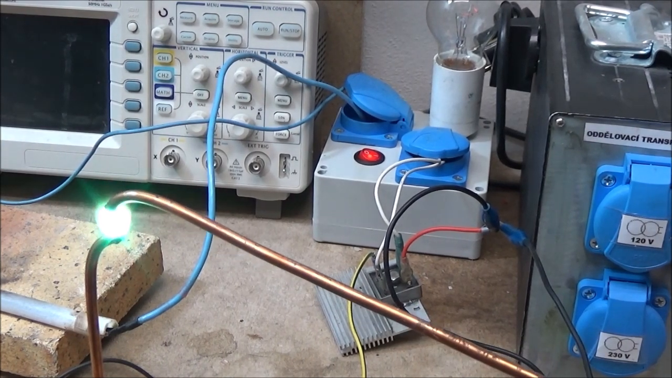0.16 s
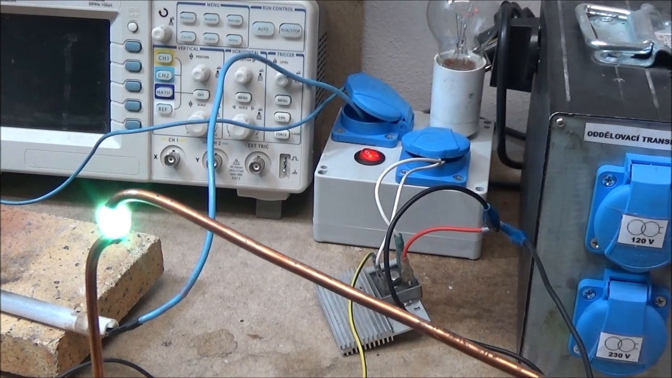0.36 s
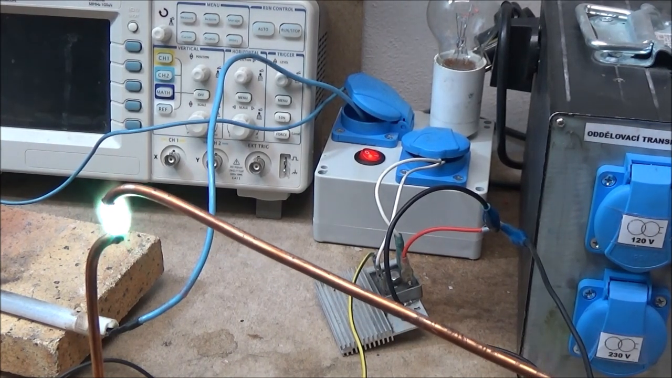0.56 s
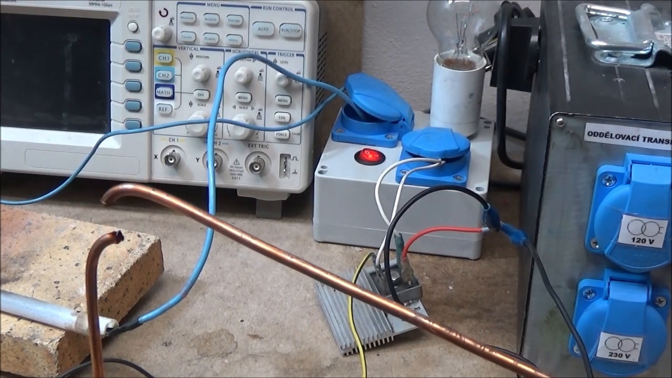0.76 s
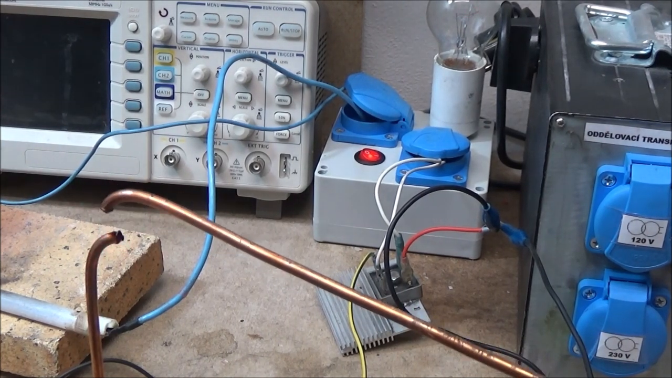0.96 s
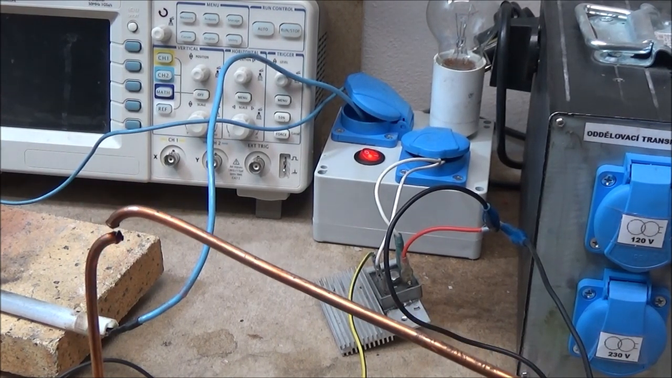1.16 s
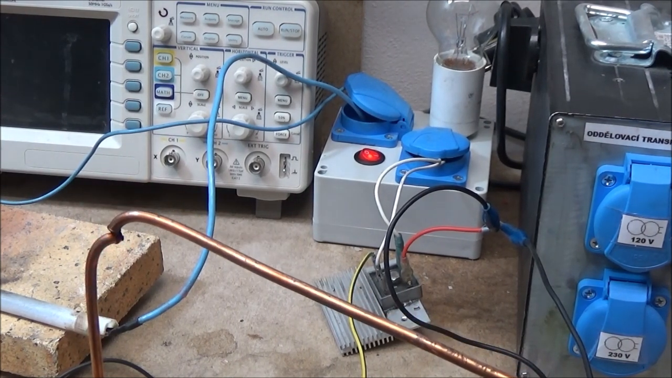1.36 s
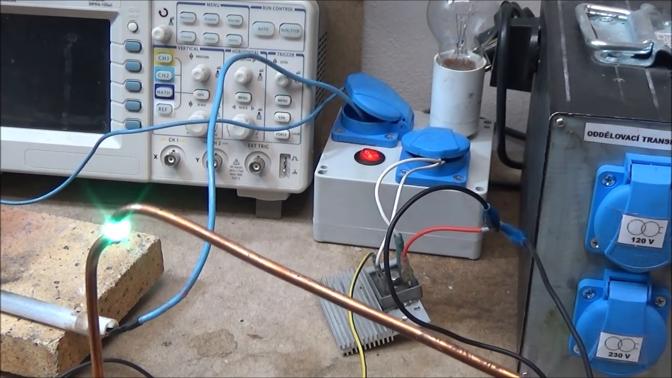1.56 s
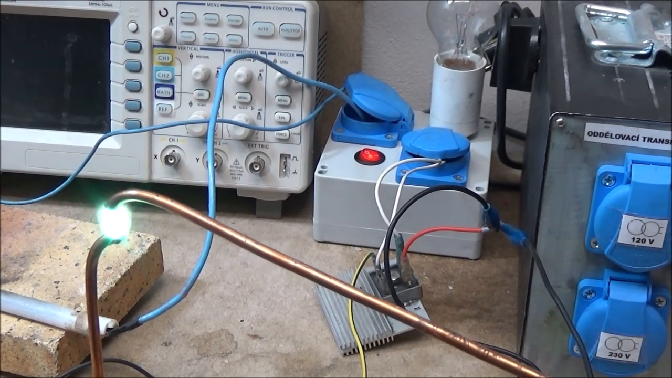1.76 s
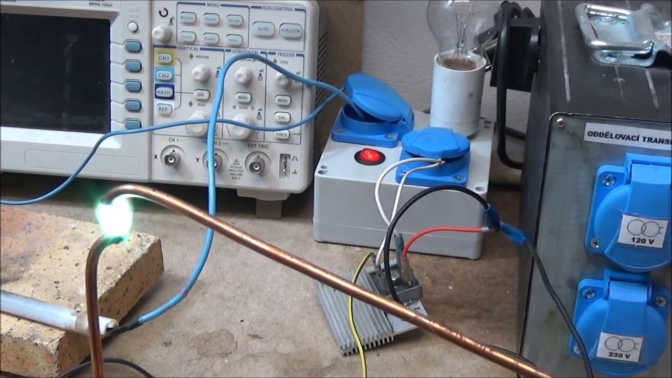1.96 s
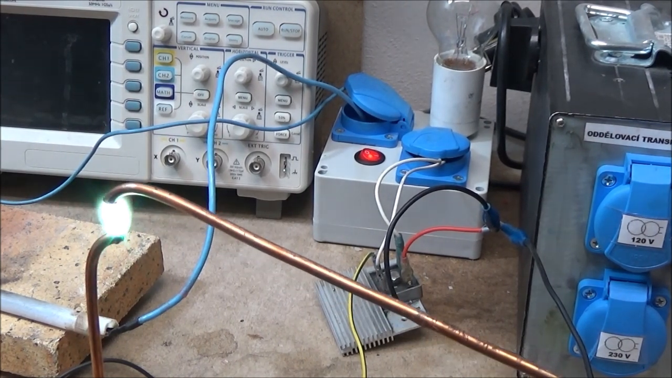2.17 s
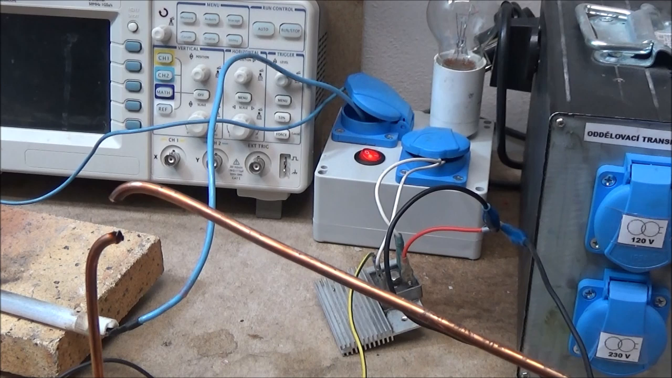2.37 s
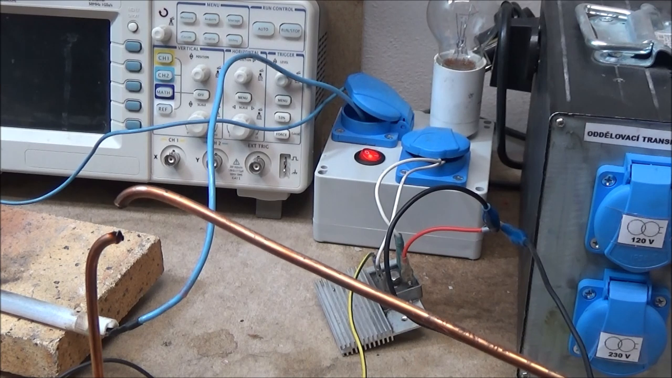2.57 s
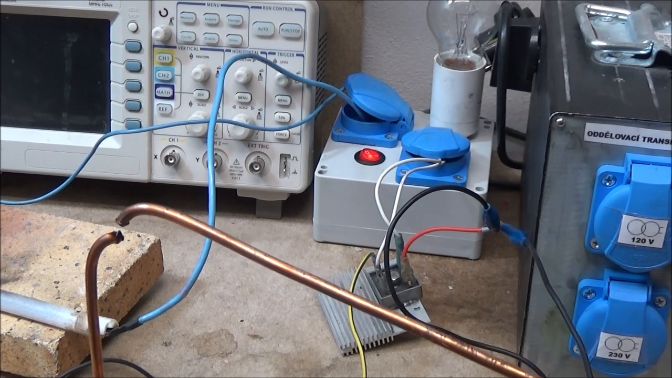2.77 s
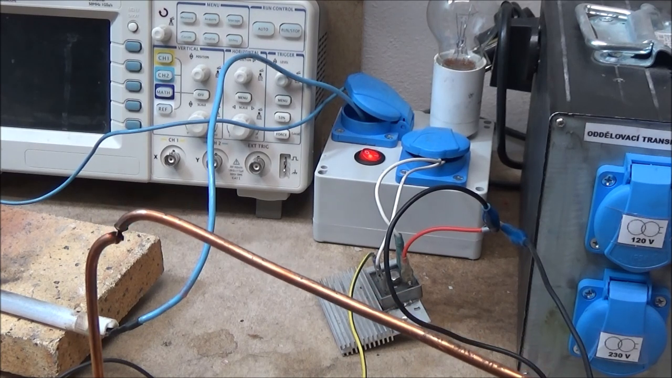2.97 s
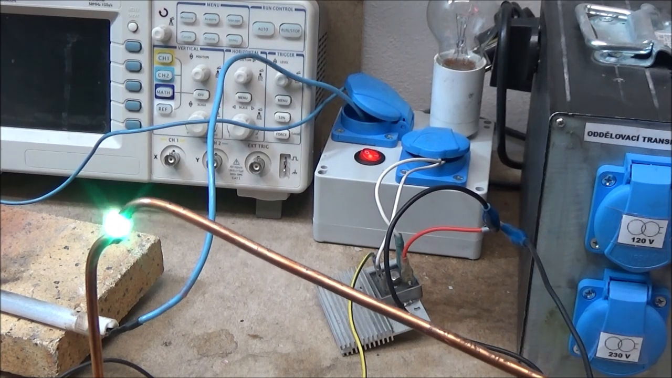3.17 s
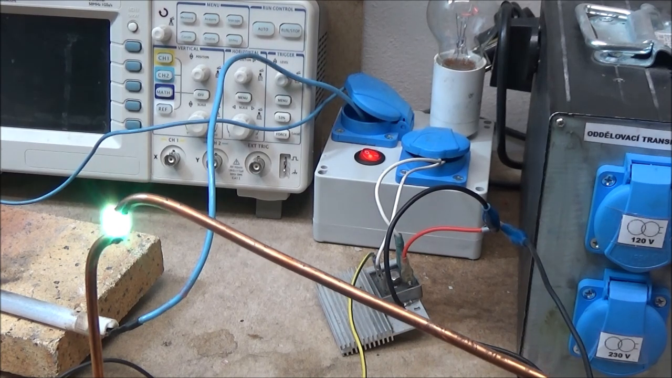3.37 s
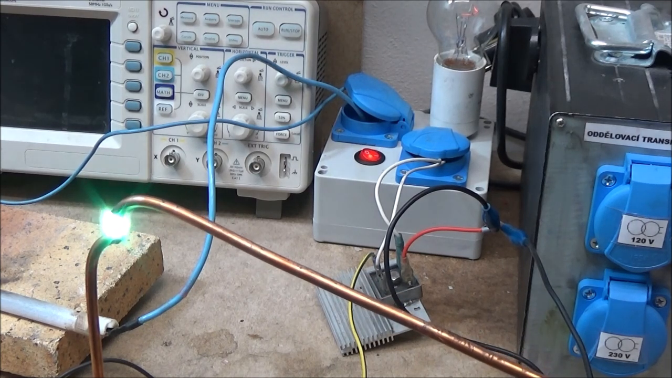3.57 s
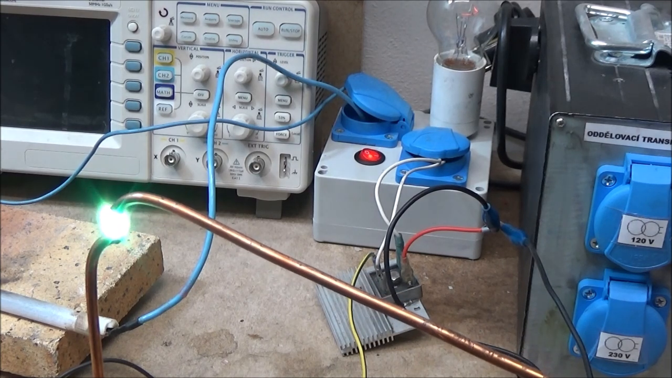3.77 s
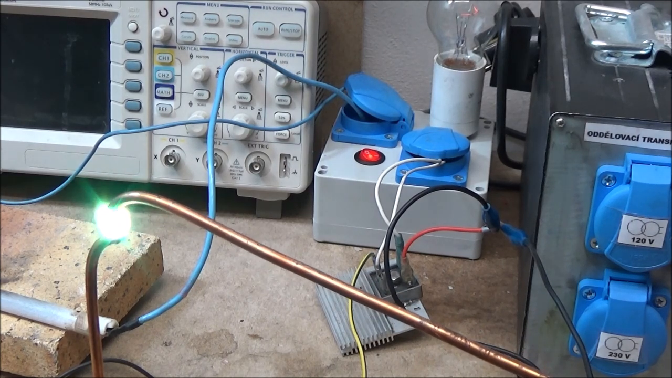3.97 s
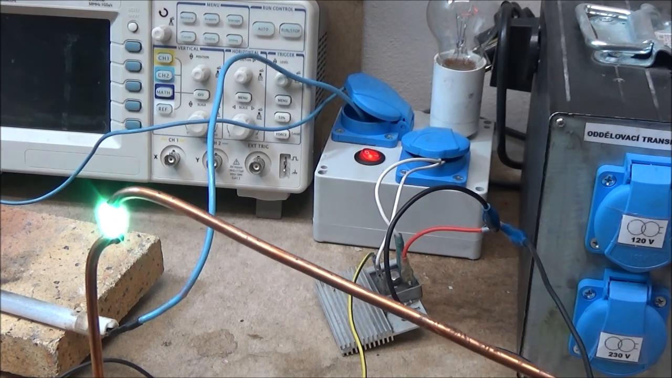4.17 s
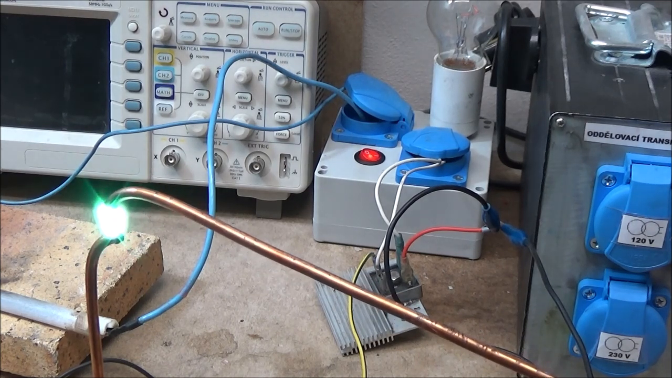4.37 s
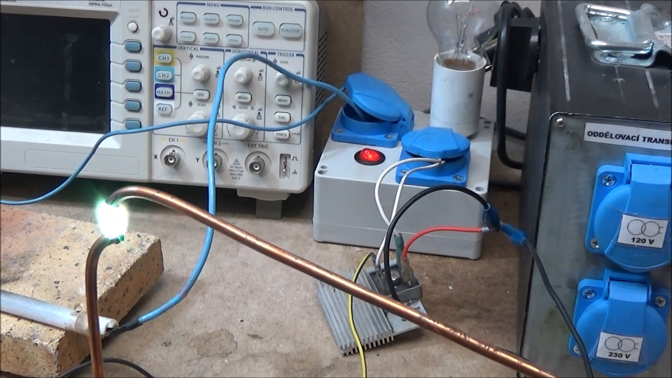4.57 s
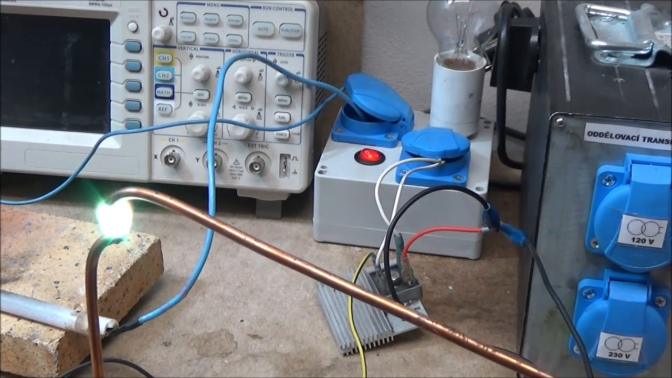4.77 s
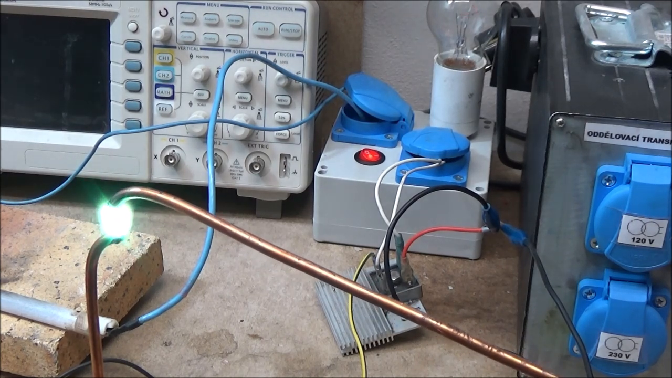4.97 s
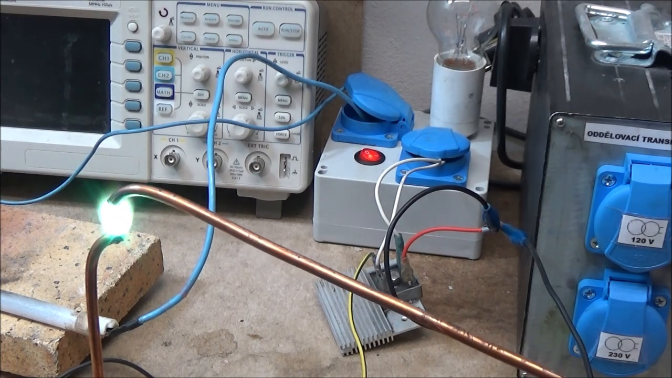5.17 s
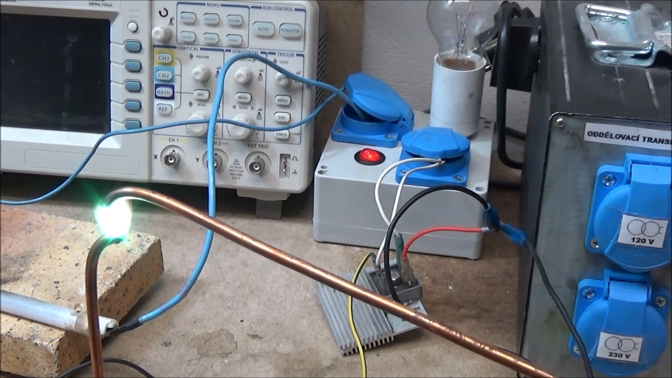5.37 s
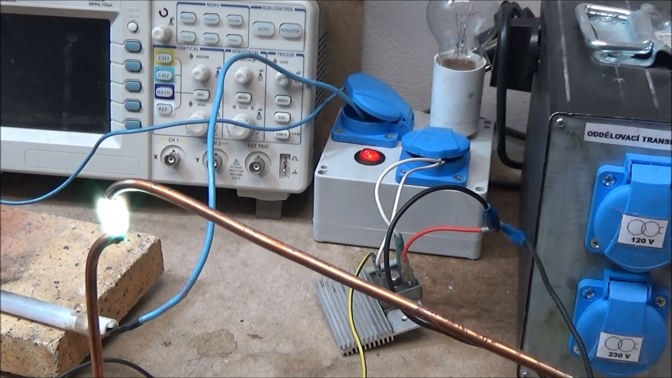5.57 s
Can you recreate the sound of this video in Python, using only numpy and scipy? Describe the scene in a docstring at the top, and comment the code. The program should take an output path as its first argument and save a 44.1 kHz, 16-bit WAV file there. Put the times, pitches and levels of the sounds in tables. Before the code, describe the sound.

Close up on a workshop bench, a hissing, crackling electric arc burns in three bursts with a low mains hum underneath. The first two end suddenly in a dull pop, leaving quiet room noise and a faint, rapid electronic ticking. Each time, copper pipes tap and bounce together before the arc restarts. The last burst is the longest, sagging for a moment and then sizzling on.

```python
"""Arc between copper pipes

Close to a workshop bench, the pipe ends a little left of the microphone. A mains-fed arc sizzles over
a low hum, coloured by short echoes from things on the bench. Twice it goes out with a soft pop, the
pipes knock together and it catches again; the last arc weakens, recovers and burns on.
In the pauses there is room noise and a faint electronic ticking."""
import sys
import numpy as np
from scipy import signal
from scipy.fft import rfft, irfft, next_fast_len
from scipy.io import wavfile
from scipy.ndimage import uniform_filter1d

SR = 44100
rng = np.random.default_rng(int(sys.argv[2]) if len(sys.argv) > 2 else 0)


def output_pcm(signal):
    """Save a mono or channel-first signal as 16-bit PCM at the path in sys.argv[1].

    Samples are clipped to [-1, 1] before scaling.
    """
    pcm = np.clip(np.atleast_2d(signal).T, -1, 1) * 32767
    wavfile.write(sys.argv[1], SR, np.round(pcm).astype(np.int16))


N = 247401
TIME = np.arange(N) / SR
FFT_SIZE = next_fast_len(N + SR)
FREQS = np.fft.rfftfreq(FFT_SIZE, 1 / SR)


def from_db(db):
    """Decibels to gain."""
    return 10 ** (np.asarray(db) / 20)


def unit_rms(x):
    """Scale to unit power."""
    return x / np.sqrt(np.mean(x ** 2) + 1e-20)


def over_hz(points):
    """A spectrum table at every frequency, joined on a log axis."""
    hz, value = np.transpose(points)
    return np.interp(np.log(FREQS + 1), np.log(hz), value)


def filtered(x, response):
    """Apply a frequency response."""
    return irfft(rfft(x, FFT_SIZE) * response, FFT_SIZE)[..., :N]


def butter(x, hz, kind, order=2):
    """Causal low-, high- or band-pass."""
    return signal.sosfilt(signal.butter(order, hz, kind, fs=SR, output="sos"), x + 1e-18)


def drift(hz):
    """A smooth random curve of unit power that changes about hz times a second."""
    return unit_rms(filtered(rng.standard_normal(N), 1 / (1 + (FREQS / hz) ** 2)))


def clicks(rows):
    """One impulse for each row of seconds and dB."""
    out = np.zeros(N)
    for s, db in rows:
        out[int(s * SR)] += from_db(db)
    return out


def snaps(rows, colour):
    """Impulses of a given colour that peak at their listed level."""
    return filtered(clicks(rows), colour / np.abs(irfft(colour)).max())


def ring(hits, hz, t60):
    """Each impulse sets a dying sine ringing."""
    radius, angle = np.exp(-np.log(1000) / (t60 * SR)), 2 * np.pi * hz / SR
    return signal.lfilter([0, np.sin(angle)], [1, -2 * radius * np.cos(angle), radius ** 2], hits + 1e-18)


def dying_noise(hits, t60):
    """Noise that jumps up with each impulse and dies away."""
    fade = signal.lfilter([1], [1, -np.exp(-np.log(1000) / (t60 * SR))], hits + 1e-18)
    return fade * rng.standard_normal(N)


# The arcs; the third barely catches. Each row: times of striking, catching and going out in seconds,
# flare in dB, time to fill out in seconds, time for the hum to swell in seconds.
ARC_BURNS = [(-.5, -.45, .731, 0, .02, .4), (1.454, 1.542, 2.327, 4.5, 0.036, .12),
             (2.94, 2.959, 2.981, -1, 0.036, .3), (3.007, 3.033, 5.7, 3, 0.0082, 0.41)]
# The last arc weakens and recovers. Each row: time in seconds, relative sizzle in dB.
LAST_BURN = [(3.13, -29.5), (4.0, -29), (4.02, -33), (4.26, -37.5), (4.56, -36.5), (4.58, -39),
             (4.63, -31.5), (4.75, -30.5), (5.6, -30.5)]
# The arc chokes briefly. Each row: centre and half length in seconds, changes of sizzle and body in dB.
ARC_CHOKES = [(3.353, 0.0079, -3, -8), (4.59, .018, -1.5, -1)]


def burning(settled_db=-30.5, fizz_db=-14, thin_db=-10, starve_db=-9.5,
            strike_s=0.0048, catch_db_per_s=500, flare_s=0.037, starve_s=0.02):
    """Supply load, sizzle and body: a barely parted contact fizzes, flares, fills out, then starves."""
    load, sizzle, body_db = np.zeros((3, N))
    held_db = np.interp(TIME, *np.transpose(LAST_BURN), left=settled_db)
    for start_s, alight_s, out_s, flare_db, fill_s, swell_s in ARC_BURNS:
        rise = np.clip((TIME - start_s) / strike_s, 0, 1)
        on = uniform_filter1d(rise * (TIME <= out_s), size=180)
        wait, age = np.maximum(alight_s - TIME, 0), np.maximum(TIME - alight_s, 0)
        catch_db = np.maximum(flare_db * np.exp(-age / flare_s) - catch_db_per_s * wait, fizz_db)
        fade_db = starve_db * np.clip(1 - (out_s - TIME) / starve_s, 0, 1)
        load += on * (1 - np.exp(-age / swell_s))
        sizzle += on * from_db(held_db + catch_db + fade_db)
        body_db += on * thin_db * np.exp(-(age / fill_s) ** 2)
    for centre_s, half_s, sizzle_change_db, body_change_db in ARC_CHOKES:
        dip = np.exp(-((TIME - centre_s) / half_s) ** 2)
        sizzle *= from_db(sizzle_change_db * dip)
        body_db += body_change_db * dip
    return load, sizzle, body_db


# The sizzle right at the gap. Each row: frequency in Hz, relative level in dB.
ARC_SPECTRUM = [(60, -26), (200, -21.5), (500, -11.5), (800, -17), (1200, -10), (1550, -10.5), (1900, -7),
                (3000, -6.5), (4500, -2.5), (7000, -0.63), (9800, 0.0), (11500, -4), (13500, -13),
                (15600, -20.5)]
# A fresh arc is thin and bright, and fills out as the gap opens.
# Each row: upper band edge in Hz, dB gained per dB of body.
BODY_BANDS = [(3000, 1), (6500, .35), (9500, 0), (20000, -.28)]
# Molten copper spits. Each row: time in seconds, peak at the gap in dB.
COPPER_SPITS = [(2.308, -20), (2.315, -17), (3.0408, -12), (3.1016, -18), (3.1877, -18), (4.4262, -22),
                (4.535, -26), (4.544, -25)]


def arc(sizzle, body_db, sparks_per_s=14000, spread_db=3.5, hiss=0.5, flicker_db=1.4,
        strong_db=-30, mains_hz=50, trim_db=-1.45):
    """Tiny discharges crackle over a hiss; a weak arc has fewer and throbs more with each half wave."""
    weakness = np.clip(1 - sizzle / from_db(strong_db), 0, 1)
    density = 1 - .8 * weakness
    fires = rng.random(N) < sparks_per_s * density / SR
    sizes = from_db(spread_db * np.minimum(rng.exponential(1, N), 4.5)) * rng.choice([-1, 1], N)
    crackle = unit_rms(fires * sizes / np.sqrt(density)) + hiss * rng.standard_normal(N)
    half_waves = np.cos(4 * np.pi * mains_hz * (TIME - .0053))
    throb = 1 + (0.11 + 0.22 * weakness) * half_waves
    crackle *= throb * from_db(flicker_db * drift(260))
    colour = from_db(over_hz(ARC_SPECTRUM))
    settled = unit_rms(butter(filtered(crackle, colour), 85, "high"))
    burn, lower_bands = 0, 0
    for edge_hz, share in BODY_BANDS:
        below_edge = filtered(settled, 1 / (1 + (FREQS / edge_hz) ** 8))
        burn += (below_edge - lower_bands) * from_db(share * body_db)
        lower_bands = below_edge
    return from_db(trim_db) * sizzle * burn + snaps(COPPER_SPITS, colour)


# Brick, pipes and instruments near the gap. Each row: echo delay in milliseconds, signed gain.
NEAR_ECHOES = [(0.707, 0.25), (0.735, -0.2), (0.903, 0.41), (1.034, 0.084), (1.156, 0.1), (1.944, -0.084),
               (2.23, 0.091), (2.28, -0.17), (2.364, 0.078), (2.48, -0.15), (2.71, 0.065), (2.802, -0.087),
               (2.86, 0.07), (2.942, -0.071), (3.173, 0.093), (3.546, -0.08), (4.755, -0.11), (4.923, 0.12),
               (6.282, -0.095), (8.729, -0.15), (10.309, 0.15)]


def bench(x):
    """The arc is a point source, so near echoes cut sharp, steady combs into its sound."""
    delay_ms, gains = np.transpose(NEAR_ECHOES)
    coarse_hz = FREQS[::16]
    comb = 1 + np.exp(-2j * np.pi * np.outer(coarse_hz, delay_ms / 1000)) @ gains
    return filtered(x, np.interp(FREQS, coarse_hz, comb))


# The supply under full load. Each row: frequency in Hz, rms level in dB.
HUM_PARTIALS = [(100, -61.6), (200, -68.5), (300, -75), (400, -76)]


def hum(load):
    """Hum at twice the mains rate swells as the arc is drawn out."""
    waver = from_db(.6 * drift(5))
    partials = sum(from_db(db) * np.sin(2 * np.pi * (hz * TIME + rng.random()))
                   for hz, db in HUM_PARTIALS)
    return np.sqrt(2) * partials * waver * load


# What the room returns to the microphone. Each row: frequency in Hz, gain in dB.
ROOM_RETURN = [(100, -11), (300, -6), (1000, -7.5), (3000, -11.5), (8000, -14.5), (12500, -14.5),
               (16000, -19)]


def workshop(x, early_t60=0.12, late_t60=0.48, late_gain=0.47, first_echo_s=0.003):
    """Dense reflections from near clutter die quickly, those from the walls linger; each side differs."""
    t = TIME[:SR // 2]
    early, late = rng.standard_normal((2, 2, len(t)))
    clutter = early * np.exp(-np.log(1000) * t / early_t60)
    walls = late_gain * late * np.exp(-np.log(1000) * t / late_t60)
    tail = (clutter + walls) * (t > first_echo_s)
    tail /= np.sqrt(np.sum(tail ** 2, axis=1, keepdims=True))
    return filtered(x, rfft(tail, FFT_SIZE) * from_db(over_hz(ROOM_RETURN)))


# Room tone around the microphone. Each row: frequency in Hz, relative level in dB.
ROOM_TONE = [(15, -33), (25, -2), (49, -8), (76, -2), (427, -4.5), (488, -6.5), (694, -6), (960, -10),
             (2610, -12), (2910, -12.5), (3330, -14.5), (4240, -15), (15900, -21)]
# Its stereo width. Each row: frequency in Hz, likeness of left and right from 0 to 1.
ROOM_LIKENESS = [(60, 1), (250, 0.68), (1000, 0), (4000, 0.43), (12000, 1)]


def room_tone(level_db=-59):
    """Steady noise and hiss, wide in the middle range, alike on both sides in the bass and at the top."""
    mid, side = rng.standard_normal((2, N))
    colour, alike = from_db(over_hz(ROOM_TONE)), over_hz(ROOM_LIKENESS)
    mid = filtered(mid, colour)
    side = filtered(side, colour * np.sqrt((1 - alike) / (1 + alike)))
    return from_db(level_db) * (mid + side * [[1], [-1]]) / mid.std()


# A rumble in the centre. Each row: time in seconds, rms level in dB.
RUMBLE_FADE = [(0, -54), (.08, -55), (.2, -63), (.45, -69), (.8, -85)]


def rumble(band_hz=(35, 85)):
    """Low noise dies away within the first second."""
    level_db = np.interp(TIME, *np.transpose(RUMBLE_FADE))
    return from_db(level_db) * unit_rms(butter(rng.standard_normal(N), band_hz, "band"))


def ticking(low_hz=2600, high_hz=3300, strong_db=-54, weak_db=-57, glide_s=0.0011, length_s=0.0091):
    """Faint electronic chirps, 25 a second, glide upward; every other one is stronger and rises later."""
    starts = np.arange(.025, 5.58, .04)
    t = TIME[:SR // 25]
    envelope = np.sin(np.pi * np.minimum(t / length_s, 1)) ** 2
    ticks = np.zeros(N)
    for db, times, bend_s in ((weak_db, starts[::2], .002), (strong_db, starts[1::2], .005)):
        hz = low_hz + (high_hz - low_hz) * (1 + np.tanh(2 * (t - bend_s) / glide_s)) / 2
        chirp = envelope * np.sin(2 * np.pi * np.cumsum(hz) / SR)
        ticks += signal.fftconvolve(clicks((s, db) for s in times), chirp)[:N]
    rasp = 1 + 0.28 * drift(400)
    return ticks * rasp


# The first two arcs go out. Each row: time in seconds, peak at the gap in dB.
POP_EVENTS = [(.7303, -20.5), (2.3262, -21)]
# The colour of the pop. Each row: frequency in Hz, relative level in dB.
POP_SPECTRUM = [(50, -18), (120, 5), (200, 4), (400, -0.5), (700, -4), (1200, -1), (2500, -11),
                (6000, -23.5)]


def pops():
    """The hot channel collapses with a dull pop."""
    return snaps(POP_EVENTS, from_db(over_hz(POP_SPECTRUM)))


def soft_bump(at_s=1.185, width_s=0.035, level_db=-57.5, band_hz=(225, 300)):
    """A dull bump swells and fades while the pipe is lowered."""
    swell = np.exp(-((TIME - at_s) / width_s) ** 2)
    return from_db(level_db) * swell * unit_rms(butter(rng.standard_normal(N), band_hz, "band"))


# The pipes touch and bounce. Each row: time in seconds, relative strength in dB, brightness in Hz.
PIPE_TOUCHES = [(1.4123, -41.5, 6000), (1.4193, -45.5, 1300), (1.4539, -44.5, 1400), (1.465, -41, 800),
                (1.49, -46.5, 450), (2.9074, -42, 5000), (2.9150, -42, 2500), (2.9380, -41, 750),
                (2.971, -45, 2000), (2.981, -43, 2800), (2.9887, -42.5, 1900), (3.0110, -48, 700)]
# The pipes on their brick and bench.
# Each row: frequency in Hz, relative level in dB, time to fall 60 dB in seconds.
PIPE_RESONANCES = [(115, -16, 0.34), (261, -6, 0.17), (295, -6, 0.16), (386, -16, 0.039), (572.6, 1, 0.14),
                   (648, 1.5, 0.042), (860, 3, 0.079), (893, 1, 0.084), (957, 1.5, 0.097), (1185, 2, 0.013),
                   (1420, -18, .03), (1684, -3, 0.12), (1900, 0, 0.041), (2970, 4.5, 0.062),
                   (3380, 1, 0.024)]


def pipe_knocks(uneven_db=2.5, ring_db=-2.5, clatter_db=8.5, crack_db=7.5):
    """Each touch cracks, clatters the supports and rings the pipes; soft contacts ring only the lows."""
    times, strength_db, bright_hz = np.transpose(PIPE_TOUCHES)
    scatter_db = uneven_db * rng.standard_normal((len(PIPE_TOUCHES), len(PIPE_RESONANCES)))
    ringing = np.zeros(N)
    for k, (hz, mode_db, t60) in enumerate(PIPE_RESONANCES):
        soft_db = -10 * np.log10(1 + (hz / bright_hz) ** 4)
        hit_db = strength_db + ring_db + mode_db + soft_db + scatter_db[:, k]
        ringing += (-1) ** k * ring(clicks(zip(times, hit_db)), hz, t60)
    clatter = dying_noise(clicks(zip(times, strength_db + clatter_db)), t60=0.092)
    hardness_db = 20 * np.log10(bright_hz / bright_hz.max())
    crack = dying_noise(clicks(zip(times, strength_db + crack_db + hardness_db)), t60=0.028)
    return ringing + butter(clatter, [240, 1500], "band") + butter(crack, [600, 7500], "band", order=4)


# The pipe ends lie a little left of the microphone. Each row: frequency in Hz, left over right in dB.
LEFT_LEAN = [(100, 0), (250, .1), (700, 1), (2000, .6), (4000, 1.3), (8000, .8), (12000, .3)]


def scene():
    """At the microphone: the bench sounds and their reverberation, over ticking and room tone."""
    load, sizzle, body_db = burning()
    sparks = arc(sizzle, body_db)
    knocks = pipe_knocks() + soft_bump()
    pop = pops()
    direct = bench(sparks) + knocks + pop + hum(load)
    reverb = workshop(sparks + from_db(-2.5) * knocks + from_db(4) * pop)
    pan = from_db(over_hz(LEFT_LEAN) * [[.5], [-.5]])
    return filtered(direct + reverb, pan) + ticking() + room_tone() + rumble()


def record(dry):
    """The recorder cuts the top steeply."""
    cutoff_hz = 15900
    return filtered(dry, 1 / np.sqrt(1 + (FREQS / cutoff_hz) ** 400))


dry = scene()
out = record(dry)
output_pcm(out)
```